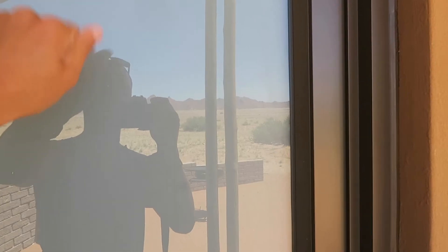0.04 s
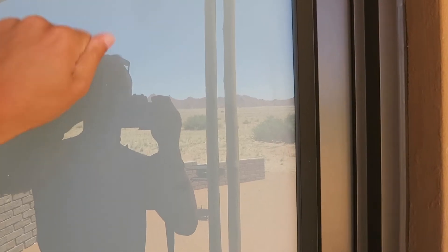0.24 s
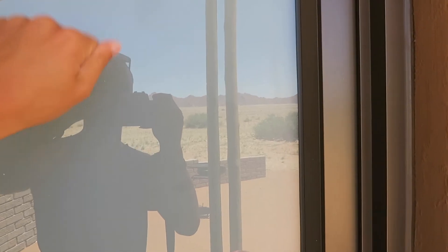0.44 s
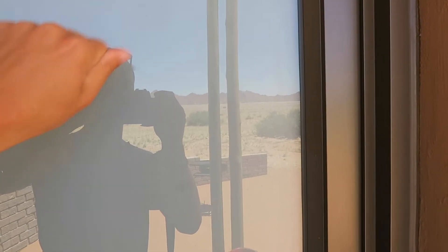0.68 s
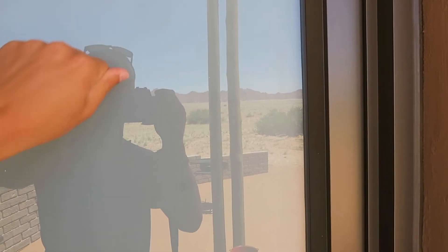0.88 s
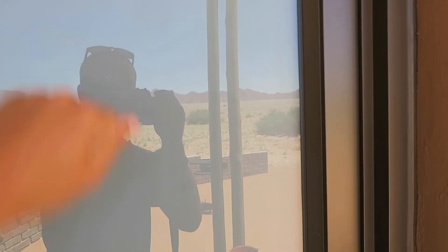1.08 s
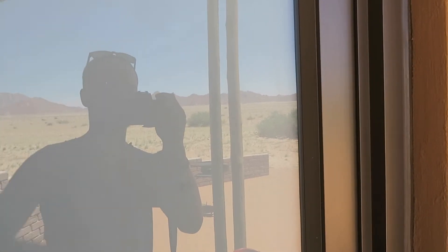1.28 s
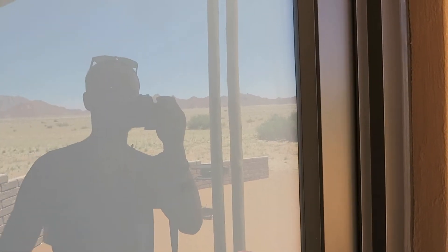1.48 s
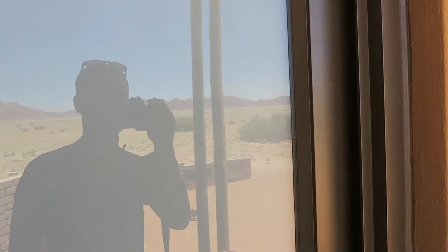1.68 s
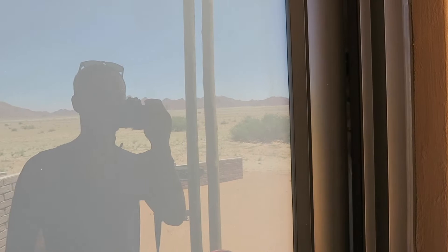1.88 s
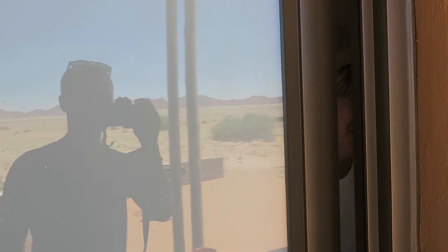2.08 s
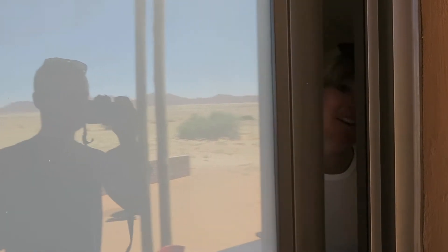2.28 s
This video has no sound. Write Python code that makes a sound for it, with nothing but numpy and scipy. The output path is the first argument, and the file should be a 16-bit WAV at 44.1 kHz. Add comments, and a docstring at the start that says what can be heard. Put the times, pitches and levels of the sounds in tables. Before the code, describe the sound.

Four hard knuckle raps ring and boom on a large glass door, very close and slightly overloaded; then the latch clacks, the frame hums briefly and wind buffets the microphone outdoors on a porch.

```python
"""Knuckles rap four times on a large glass door that still hums from an earlier knock, loud enough to overload
the microphone. Each rap adds up a harsh burst of treble noise, a falling bending wave, pane ringing and a boom.
The latch clacks in bursts of noise with ringing metal, and a note hums as the door is eased open.
Outdoors, shaped noise makes a steady airy hiss and gusts; short wobbling tones make the strongest wind thumps."""
import sys
import numpy as np
from scipy import signal
from scipy.fft import rfft, irfft
from scipy.io import wavfile
from scipy.ndimage import uniform_filter1d

SR = 44100
rng = np.random.default_rng(int(sys.argv[2]) if len(sys.argv) > 2 else 0)


def store_pcm(level_fs):
    """Save levels as 16-bit WAV."""
    pcm = np.round(np.clip(level_fs, -1, 1) * 32767).astype(np.int16)
    wavfile.write(sys.argv[1], SR, np.atleast_2d(pcm).T)


N = 103370  # length of the scene in samples


def amp(db):
    """Turns decibels into a gain."""
    return 10 ** (np.asarray(db) / 20)


def unit(x):
    """Scales a sound to an rms level of 1."""
    return x / np.sqrt(np.mean(x ** 2) + 1e-20)


def by_hz(points, hz):
    """Reads a table between its points, on a log-frequency axis."""
    f, value = np.transpose(points)
    return np.interp(np.log(hz + 1), np.log(f + 1), value)


def by_time(points):
    """Reads a time curve at every sample."""
    return np.interp(np.arange(N) / SR, *np.transpose(points))


def add(mix, start_s, sound):
    """Mixes a sound in at its start time; anything outside the mix is cut off."""
    at = round(start_s * SR)
    sound = sound[:, max(-at, 0):]
    part = mix[:, max(at, 0):][:, :sound.shape[1]]
    part += sound[:, :part.shape[1]]


def noise(size, gain, same):
    """Makes two related channels of noise; gain and likeness are functions of frequency."""
    hz = np.fft.rfftfreq(size, 1 / SR)
    left, other = rfft(rng.standard_normal((2, size)))
    likeness = np.clip(same(hz), -1, 1)
    right = likeness * left + np.sqrt(1 - likeness ** 2) * other
    return unit(irfft(np.array([left, right]) * gain(hz), size))


def ports(x, delay_s):
    """Lets the right microphone port hear a sound a little later than the left."""
    hz = np.fft.rfftfreq(2 * N, 1 / SR)
    late = rfft(x[1], 2 * N) * np.exp(-2j * np.pi * hz * delay_s)
    return np.array([x[0], irfft(late)[:N]])


# swings of the whole pane: (frequency [Hz], relative level [dB], time to fade by 60 dB [s])
BOOM_MODES = [(25.5, -10, 0.52), (53.6, -8.5, 0.38), (60.2, -17, 0.47), (74.05, -8, 0.51),
              (116.5, -14.5, 0.31)]


def boom(t):
    """The whole pane swings in and out at a few low frequencies."""
    return -sum(amp(level - 60 * t / t60) * np.sin(2 * np.pi * hz * t) for hz, level, t60 in BOOM_MODES)


# tone of the dense ring of glass and frame: (frequency [Hz], relative level per Hz [dB])
RING_COLOUR = [(60, -4.5), (150, -3), (400, 0), (800, -4), (1300, -6.5), (2100, -5), (2450, -20.5),
               (5000, -22), (12000, -69)]
# how long that ring lasts: (frequency [Hz], time to fade by 60 dB [s])
RING_FADE = [(100, 0.38), (400, 0.51), (1100, 0.3), (3000, 0.13)]


def dense_ring(size, same=0.95):
    """Countless weak modes of glass and frame blend into noise, the high ones dying first."""
    x = noise(size, lambda hz: amp(by_hz(RING_COLOUR, hz)), lambda hz: same)
    hz, t, spectrum = signal.stft(x, SR, nperseg=256)
    fade = amp(-60 * t / by_hz(RING_FADE, hz)[:, None])
    return signal.istft(spectrum * fade, SR, nperseg=256)[1][:, :size]


# higher modes of the pane: (frequency [Hz], relative level [dB], time to fade by 60 dB [s])
PANE_MODES = [(194.8, -3.5, .2), (247.4, -11.5, 0.3), (277.7, -1.5, 0.14), (319, -5.5, .15),
              (379, -7, 0.28), (401.8, -1.5, 0.2), (450.5, -6, 0.21), (539, -6, 0.074), (645.3, -2.5, 0.15),
              (674.6, 1.5, 0.077), (738, -6.5, .17), (801, -6.5, .13), (819, -11, 0.18), (903, -13, 0.12),
              (1030, -4, .14), (1131, 1, 0.09), (1285, -15, .13), (1420, -8.5, 0.07), (1575, -19, 0.22),
              (1630, -12.5, 0.18), (1675, -18, .14), (1890, -7.5, 0.1), (2092, -10, 0.1)]
PANE_DB, RING_DB = -17, -20.5
# the first bending wave: level, time scale of the falling pitch, turns, decay to 1/e
FLEX_DB, FLEX_S, FLEX_TURNS, FLEX_DECAY_S = 18.5, 0.0001383, 0.4026, 0.00084
# short treble noise, the harsh edge of the overloaded microphone at the first contact:
# level, centre, half width of its band, decay to 1/e
EDGE_NOISE_DB, EDGE_NOISE_HZ, EDGE_NOISE_WIDTH_HZ, EDGE_NOISE_S = -2, 3800, 2300, 0.00082


def knock(db, lag_s, second_db, ring_db, dull_hz, boom_db,
          spread_rad=0.39, build_s=0.0012, skin_hz=7000, edge_same=0.95):
    """Two knuckles land a moment apart, the first with a harsh edge; each bends the glass and sets it ringing."""
    t = np.arange(SR * 3 // 4) / SR
    # in a bending wave the treble runs ahead of the bass, so the pitch falls
    flex_turns = FLEX_TURNS * np.log1p(t / FLEX_S)
    flex = -amp(FLEX_DB) * np.sin(2 * np.pi * flex_turns) * np.exp(-t / FLEX_DECAY_S)
    flex = signal.lfilter(*signal.butter(2, skin_hz, fs=SR), flex)

    # neighbouring modes push in opposite directions and reach each port at a slightly different phase
    modes = 0
    for k, (hz, level, t60) in enumerate(PANE_MODES):
        phase = spread_rad * rng.standard_normal((2, 1))
        modes = modes + (-1) ** k * amp(level - 60 * t / t60) * np.sin(2 * np.pi * hz * t + phase)
    ring = amp(PANE_DB) * modes + amp(RING_DB) * dense_ring(len(t))
    ring = ring * (1 - np.exp(-t / build_s))
    ring = signal.lfilter(*signal.butter(1, dull_hz, fs=SR), ring)

    def treble_band(hz):
        return 1 / (1 + ((hz - EDGE_NOISE_HZ) / EDGE_NOISE_WIDTH_HZ) ** 4)
    edge = noise(len(t), treble_band, lambda hz: edge_same) * np.exp(-t / EDGE_NOISE_S)
    one_knuckle = flex + amp(ring_db) * ring
    both = one_knuckle + amp(EDGE_NOISE_DB) * edge
    add(both, lag_s, amp(second_db) * one_knuckle)
    return amp(db) * (both + amp(boom_db) * boom(t))


# the raps; the one before time 0 leaves the opening hum: (time [s], level [dB], lag of second knuckle [s],
# relative level of second knuckle [dB], ring level [dB], ring dull above [Hz], boom level [dB])
KNOCKS = [(-.085, 2, 0.0014, -56, -3, 1500, -11), (0.1714, -0.5, 0.0029, -5.5, 1.5, 1300, -3),
          (.4102, -2, 0.0017, -.5, 0.5, 2000, -3.5), (.6692, 0.5, 0.001356, -4, -0.5, 3000, -6),
          (0.9250, -0.5, .00056, -7, -0.5, 4500, -5.5)]
# the hand lifts off and the pane sways
SWAY_S, SWAY_DB, SWAY_SWELL_S = 1.165, -24, 0.04


def window(delay_s=0.000098, right_db=-0.86):
    """All the raps ring one pane, which sways once more as the hand leaves it."""
    out, t = np.zeros((2, N)), np.arange(SR // 2) / SR
    for start_s, *row in KNOCKS:
        add(out, start_s, knock(*row))
    sway = boom(t) * np.minimum(t / SWAY_SWELL_S, 1)
    add(out, SWAY_S, amp(SWAY_DB) * sway[None])
    return ports(out, delay_s) * amp([[0], [right_db]])


# tone of the hiss: (frequency [Hz], relative level per Hz [dB])
AIR_COLOUR = [(25, 4), (60, 4), (120, 3), (200, -11), (275, 4), (370, -5.5), (500, -2.5), (620, -5.5),
              (900, -7), (1400, -9), (2000, -15), (3300, -10), (5000, -23.5), (7000, -24.5), (11500, -26),
              (14000, -45), (16000, -65)]
# resonances of the porch in the hiss: (frequency [Hz], half width [Hz], lift [dB])
PORCH = [(499, 7.9, 6), (746, 21, 6), (918, 22, 8), (1280, 48, 2), (1615, 11, 4.5), (1825, 16, 9),
         (2070, 19, 11)]
# how alike left and right are: (frequency [Hz], likeness [0 to 1])
AIR_SAME = [(50, 1), (300, 0.91), (900, 0.89), (1500, 0.33), (2600, 0.98), (3700, 0.97), (6000, 0.38),
            (12000, 1)]
# loudness of the hiss: (time [s], level [dB])
AIR_LEVEL = [(0, -27), (.16, -27.5), (.22, -34), (.4, -30), (.45, -37), (.65, -34.5), (.70, -36), (.9, -39),
             (.97, -42), (1.3, -37.5), (1.55, -33), (1.75, -30.5), (2.1, -31), (2.34, -26.5)]


def air(flutter_db=3.0, delay_s=0.00014):
    """Uneven outdoor hiss from one side, coloured by nearby walls; it sinks during the knocks and comes back."""
    def colour(hz):
        lift_db = sum(db / (1 + ((hz - f) / width) ** 2) for f, width, db in PORCH)
        return amp(by_hz(AIR_COLOUR, hz) + lift_db)
    x = noise(N, colour, lambda hz: by_hz(AIR_SAME, hz))
    spectrum = signal.stft(x, nperseg=512)[2]
    # smooth random patches in pitch and time make the hiss flutter
    patches = rng.standard_normal(spectrum.shape[1:])
    patches = uniform_filter1d(patches, size=8, axis=0)
    patches = unit(uniform_filter1d(patches, size=8, axis=1))
    x = signal.istft(spectrum * amp(flutter_db * patches), nperseg=512)[1][:, :N]
    return ports(unit(x), delay_s) * amp(by_time(AIR_LEVEL))


# clicks of latch and frame: (time [s], level [dB], relative level of frame [dB], rise [s], decay to 1/e [s])
CLICKS = [(0.568, -44.5, 8, 0.0033, 0.013), (0.74, -35, 3, 0.0016, 0.0086), (1.35, -45.5, 2, 0.0035, 0.085),
          (1.531, -22, -1, 0.0034, 0.024), (1.5452, -23, 2.5, 0.0014, 0.015),
          (1.5484, -17, -6, 0.0008, 0.0022), (1.5514, -16.5, -3.5, .0005, 0.0037),
          (1.558, -35, 6.5, 0.0026, 0.021), (1.717, -41, 11.5, 0.0013, 0.013),
          (1.928, -33, -26, 0.0015, 0.011)]
# tone of the latch metal's noise: (frequency [Hz], half width [Hz], relative level [dB])
METAL = [(3960, 230, -11), (4930, 390, -6.5), (6030, 165, -2), (6970, 700, -7.5), (8340, 270, -10),
         (9230, 870, -7), (11700, 1400, -11)]
# tone of the door frame's noise: (frequency [Hz], half width [Hz], relative level [dB])
FRAME = [(450, 460, -3.5), (748, 26, 3), (1085, 116, 2.5), (1574, 41, 9.5), (1964, 145, 0), (2486, 15, 3.5),
         (2720, 1100, -10)]
# ringing of metal and frame: (frequency [Hz], relative level [dB], time to fade by 60 dB [s])
LATCH_RING = [(128, -6.5, .2), (500, -5, .12), (737, -4, 0.11), (1110, -2.5, 0.1), (1540, 5, .13),
              (2080, 0, .09), (2520, 13, .11), (5015, -14, 0.098), (6000, -1, 0.11), (6130, -12, 0.15),
              (8250, -2, 0.25), (9700, 1, .15)]
GRIT_DB, LATCH_RING_DB = 3.5, -22
# the frame hums as the door comes free:
# (time [s], level [dB], frequency [Hz], time to fade by 60 dB [s], swell [s])
DOOR_NOTE = (1.711, -28, 502, .28, .008)


def latch(metal_same=0.41, frame_same=0.86, delay_s=0.0001, top_hz=12800):
    """Short gritty scrapes and snaps ring the latch metal and the door frame, which then hums one note."""
    def body(table):
        return lambda hz: np.sqrt(sum(amp(db) ** 2 / (1 + ((hz - f) / w) ** 2) ** 2 for f, w, db in table))
    out, t = np.zeros((2, N)), np.arange(SR // 4) / SR
    for start_s, db, body_db, rise_s, decay_s in CLICKS:
        metal = noise(len(t), body(METAL), lambda hz: metal_same)
        frame = noise(len(t), body(FRAME), lambda hz: frame_same)
        roughness = unit(uniform_filter1d(rng.standard_normal(len(t)), size=50))
        grit = unit(amp(GRIT_DB * roughness))
        ring = 0
        for hz, level, t60 in LATCH_RING:
            swing = np.sin(2 * np.pi * (hz * t + rng.random((2, 1))))
            ring = ring + amp(LATCH_RING_DB + level - 60 * t / t60) * swing
        rise = np.minimum(t / rise_s, 1)
        fade = np.exp(-np.maximum(t - rise_s, 0) / decay_s)
        scrape = fade * grit * (metal + amp(body_db) * frame)
        add(out, start_s, amp(db) * rise * (ring + scrape))

    start_s, db, hz, t60, swell_s = DOOR_NOTE
    note = np.minimum(t / swell_s, 1) * amp(db - 60 * t / t60) * np.sin(2 * np.pi * hz * t)
    add(out, start_s, note[None])
    out = signal.sosfilt(signal.butter(10, top_hz, fs=SR, output="sos"), out)
    return ports(out, delay_s)


# strength of the buffeting: (time [s], level [dB])
WIND = [(1.28, -63), (1.31, -33), (1.345, -32.5), (1.39, -29.5), (1.45, -70), (1.50, -64), (1.525, -28.5),
        (1.57, -30), (1.63, -49), (1.67, -33), (1.70, -21), (1.75, -28), (1.785, -16.5), (1.82, -29.5),
        (1.845, -21.5), (1.88, -34), (1.915, -23.5), (1.98, -36.5), (2.06, -19), (2.12, -25), (2.15, -42),
        (2.18, -24.5), (2.27, -34.5), (2.30, -19.5), (2.34, -14)]
# side of the buffeting: (time [s], left minus right [dB])
WIND_PAN = [(1.35, -10), (1.55, -0.5), (1.69, 5), (1.79, 9), (1.85, 2.5), (2.04, -2.5), (2.13, 1),
            (2.34, 1)]
# tone of the low gusts: (frequency [Hz], relative level per Hz [dB])
GUST_LOW = [(10, -30.5), (28, 8), (45, -2.5), (95, 7), (150, 2.5), (220, -12.5), (400, -59.5), (1000, -83)]
# tone of the higher gusts: (frequency [Hz], relative level per Hz [dB])
GUST_HIGH = [(60, -9.5), (130, -9.5), (190, -1), (300, -7.5), (450, -10.5), (800, -57), (2000, -85)]
# how alike left and right are: (frequency [Hz], likeness [0 to 1])
GUST_SAME = [(30, 0.99), (100, 1), (300, 0.5)]
# growth: dB of high gust for each dB of strength
GUST_LOW_DB, GUST_HIGH_DB, GUST_GROWTH = -1, -2, 1.45


def wind():
    """Eddies buffet the microphone ports; the stronger ones reach higher in pitch."""
    def eddies(spectrum):
        x = noise(N, lambda hz: amp(by_hz(spectrum, hz)), lambda hz: by_hz(GUST_SAME, hz))
        power = uniform_filter1d((abs(signal.hilbert(x)) ** 2).mean(0), size=600)
        # even out the noise's own swells so that the strength curve leads
        return unit(x / np.sqrt(power + 0.22))
    strength, pan = by_time(WIND), by_time(WIND_PAN)
    low = eddies(GUST_LOW) * amp(GUST_LOW_DB + strength)
    high = eddies(GUST_HIGH) * amp(GUST_HIGH_DB + GUST_GROWTH * strength)
    return (low + high) * amp(np.array([pan, -pan]) / 2)


# single strong eddies: (time [s], level [dB], length [s], first frequency [Hz], last frequency [Hz],
# left minus right [dB]); the frequencies wobble around this glide
EDDIES = [(1.325, -17.5, 0.028, 118, 74.7, -7), (1.337, -22.5, 0.017, 218, 150, -10),
          (1.682, -11, 0.011, 258, 157, 10), (1.689, -10.5, 0.02, 116.5, 69.4, 8),
          (1.766, -16, 0.026, 286, 210, 7.5), (1.777, -10.5, 0.02, 110, 80, 6.5),
          (1.792, -13.5, .012, 290, 160, 8.5), (1.830, -12.5, 0.018, 101, 69.5, -4),
          (2.038, -7, 0.011, 184, 127, -4), (2.117, -17, 0.02, 179, 139, 4),
          (2.168, -19, 0.023, 172, 135, 4.5), (2.208, -23, 0.021, 109, 64.6, -1.5),
          (2.306, -11, 0.025, 193, 304, -2), (2.322, -9, 0.031, 140, 227, -3),
          (2.327, -20, 0.021, 332, 436, 13.5)]


def thumps(wobble=0.26):
    """Each strong eddy is a few uneven swings of pressure at the microphone."""
    out = np.zeros((2, N))
    for start_s, db, length_s, first_hz, last_hz, pan_db in EDDIES:
        u = np.arange(0, 1, 1 / (length_s * SR))  # progress through the eddy
        extra_turns, wobble_start, phase = rng.random(3)
        glide = first_hz * (last_hz / first_hz) ** u
        hz = glide * (1 + wobble * np.sin(2 * np.pi * ((2 + extra_turns) * u + wobble_start)))
        swell = np.sin(np.pi * u ** 1.18)
        swing = swell * np.sin(2 * np.pi * (np.cumsum(hz) / SR + phase))
        add(out, start_s, amp(db + np.array([[pan_db], [-pan_db]]) / 2) * swing)
    return out


def scene():
    """Knocks, air, latch and wind sound together."""
    return window() + air() + latch() + wind() + thumps()


# tone of the microphone and its input: (frequency [Hz], lift [dB])
TONE = [(8, -19), (32, 0), (100, 1), (2000, -1), (3200, 1.5), (6000, -1.5), (8500, -9.5), (12000, -18),
        (16000, 2)]
EDGE_HZ = 15300  # nothing much passes above this


def record(dry):
    """The input overloads smoothly on loud peaks; then its tone colour and treble limit shape the sound."""
    clipped = dry / (1 + dry ** 8) ** (1 / 8)
    tone = amp(by_hz(TONE, np.fft.rfftfreq(2 * N, 1 / SR)))
    coloured = irfft(rfft(clipped, 2 * N) * tone)[:, :N]
    treble_limit = signal.firwin(255, EDGE_HZ, window=("kaiser", 9), fs=SR)
    return signal.oaconvolve(coloured, treble_limit[None], "same")


dry = scene()
out = record(dry)
store_pcm(out)
```